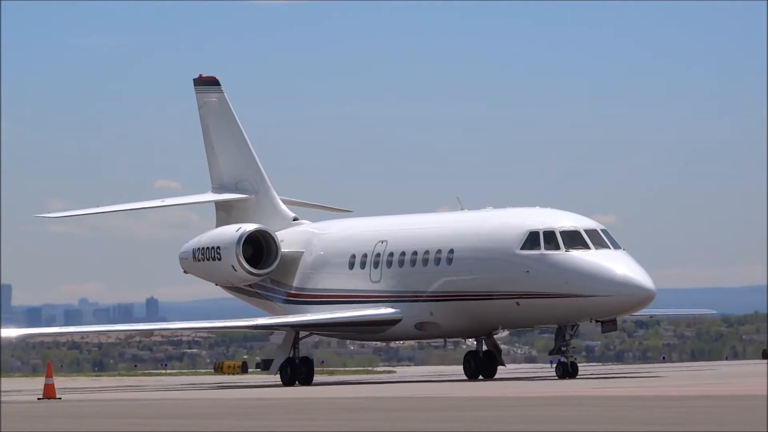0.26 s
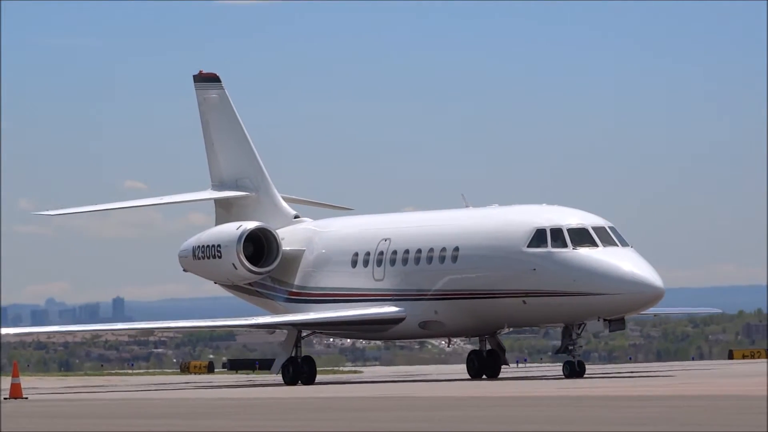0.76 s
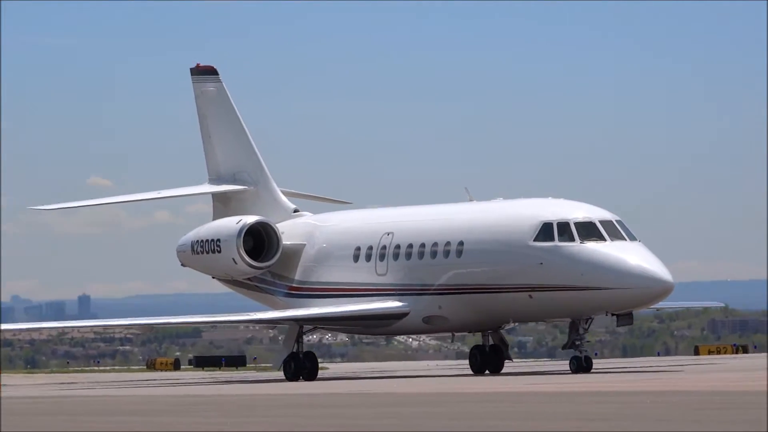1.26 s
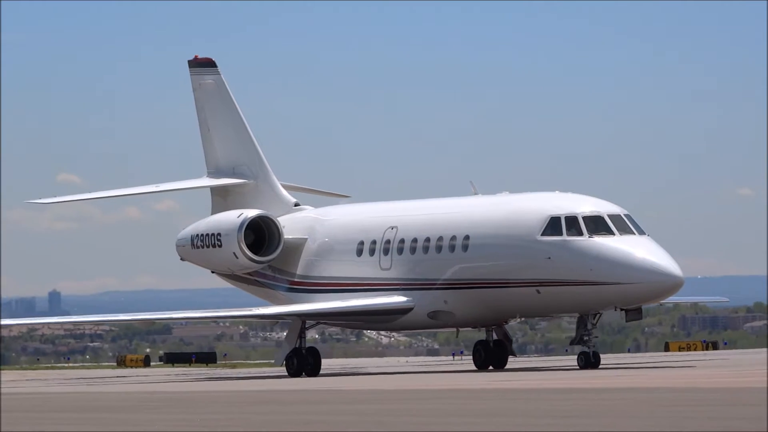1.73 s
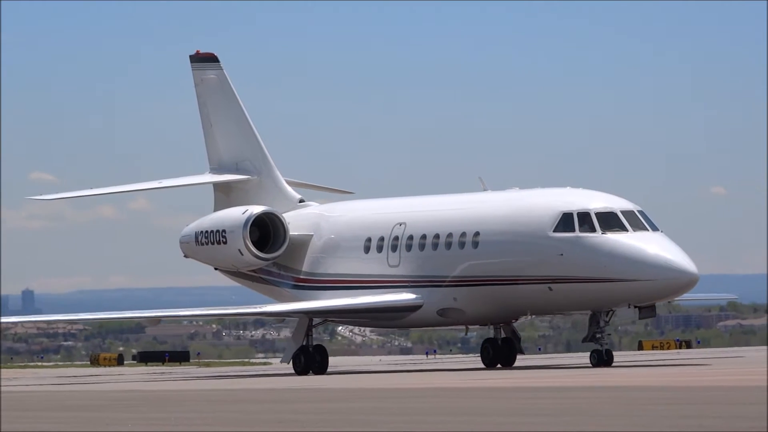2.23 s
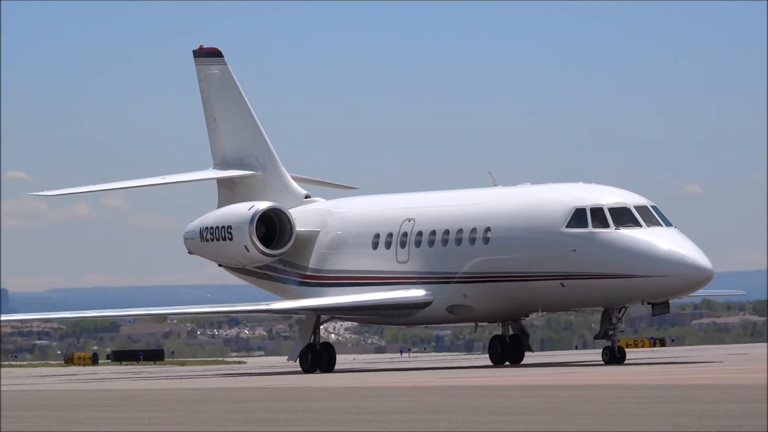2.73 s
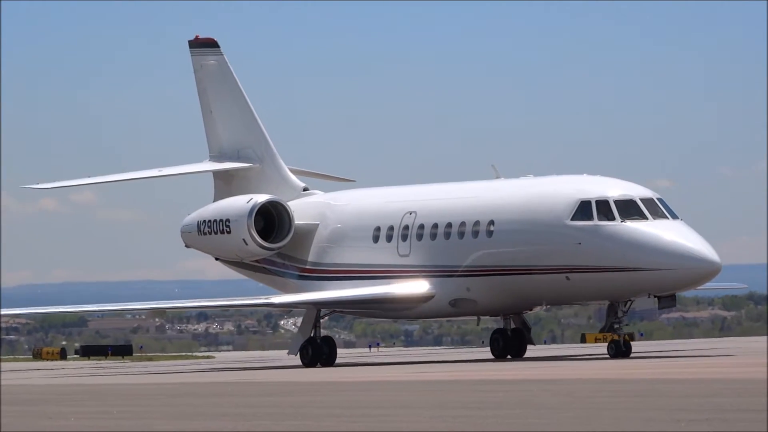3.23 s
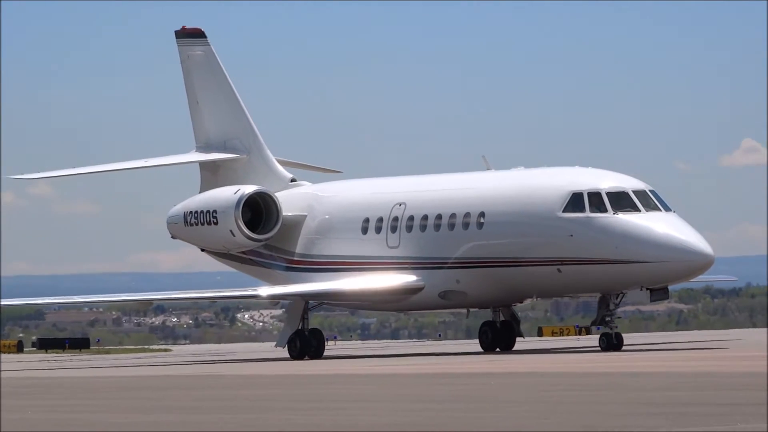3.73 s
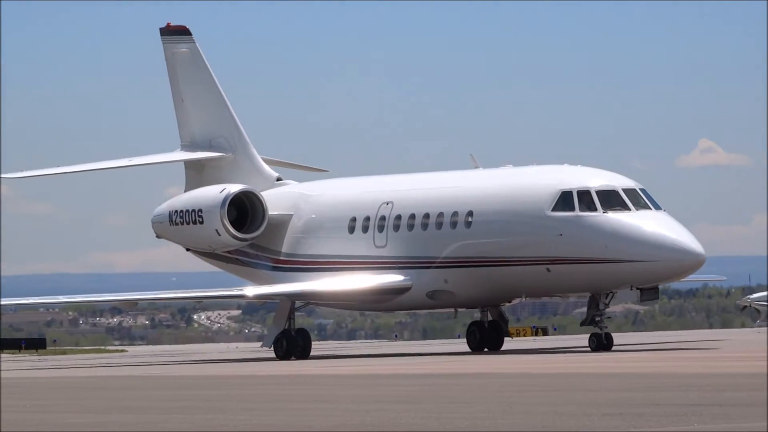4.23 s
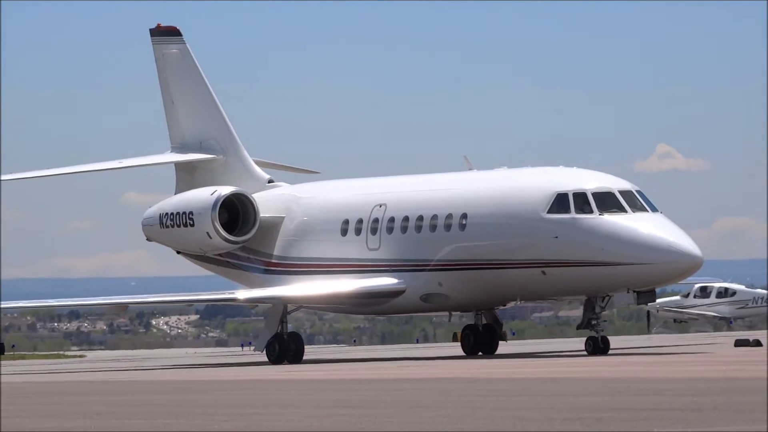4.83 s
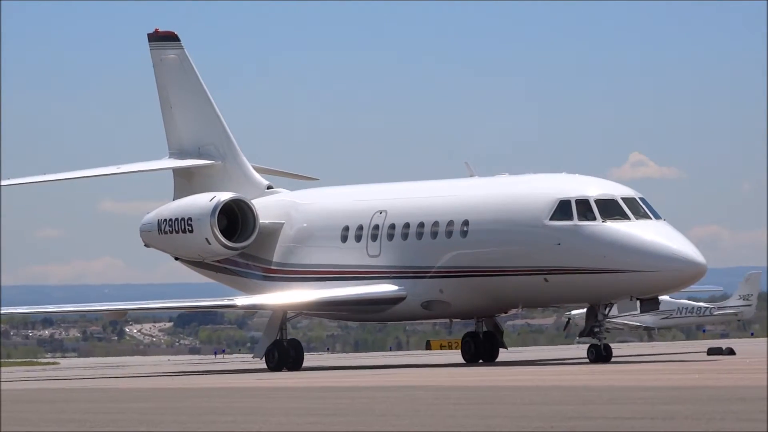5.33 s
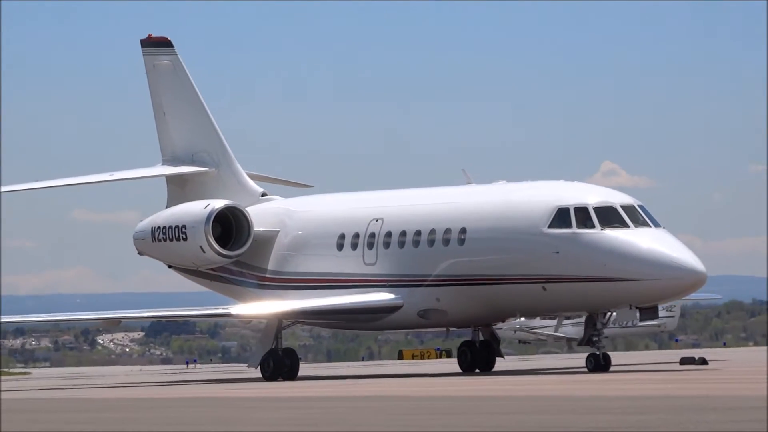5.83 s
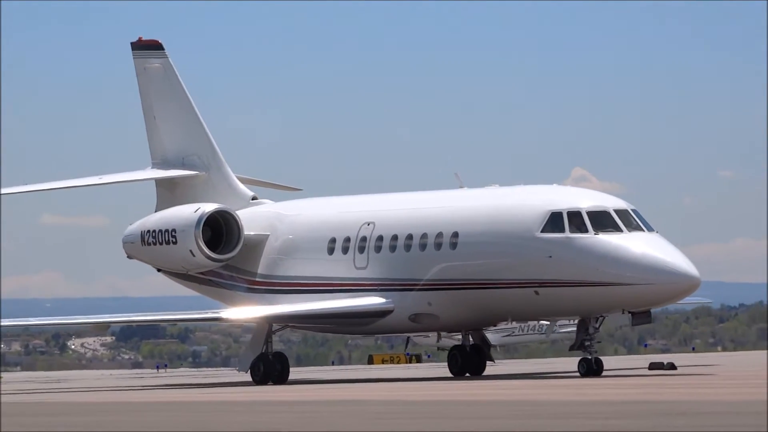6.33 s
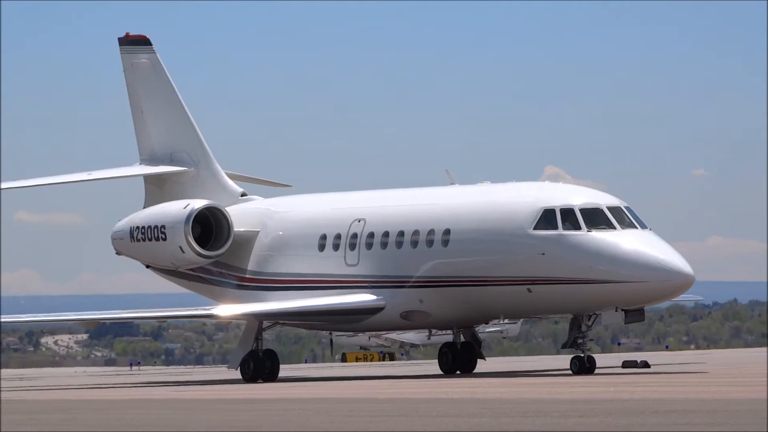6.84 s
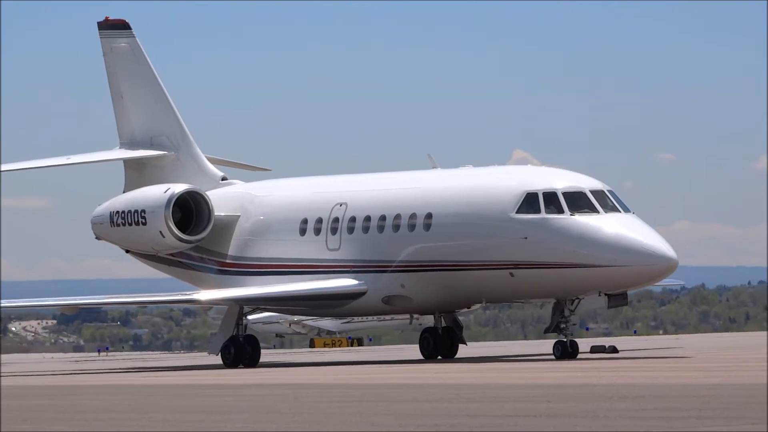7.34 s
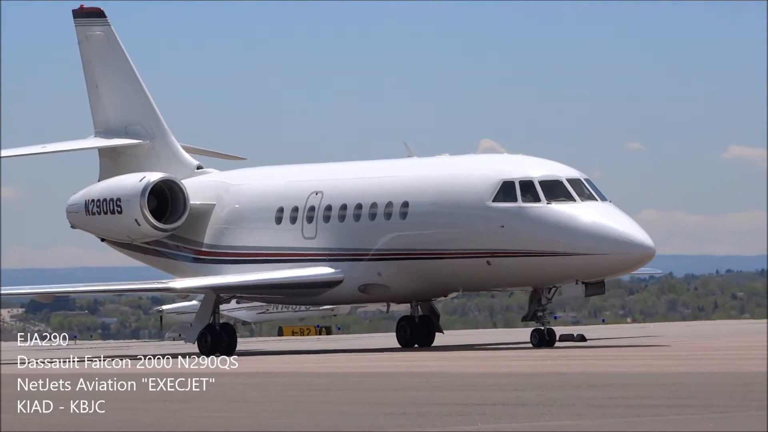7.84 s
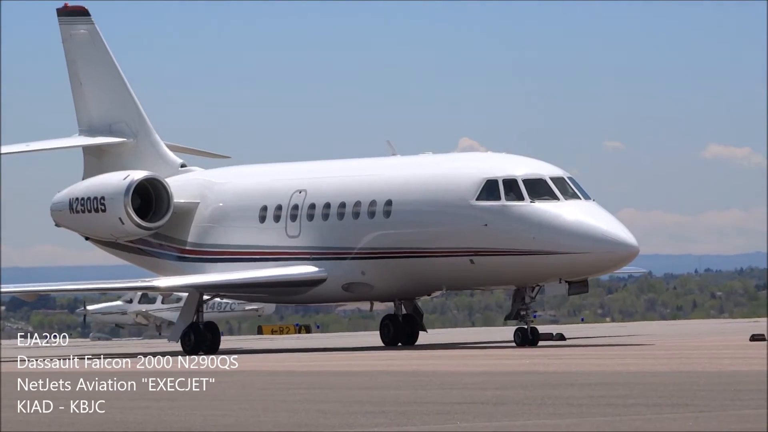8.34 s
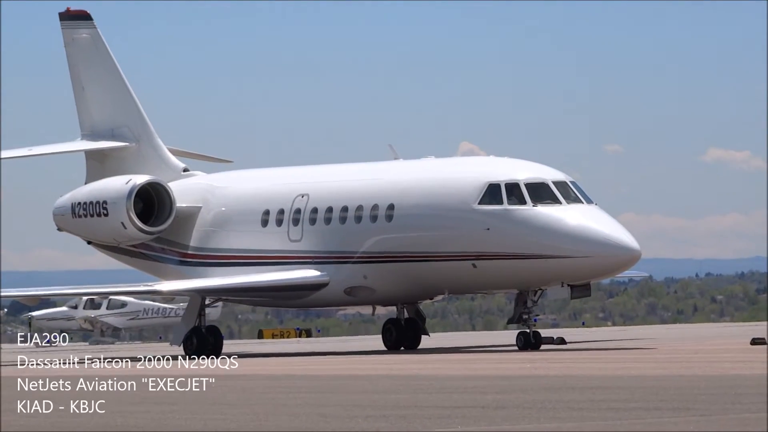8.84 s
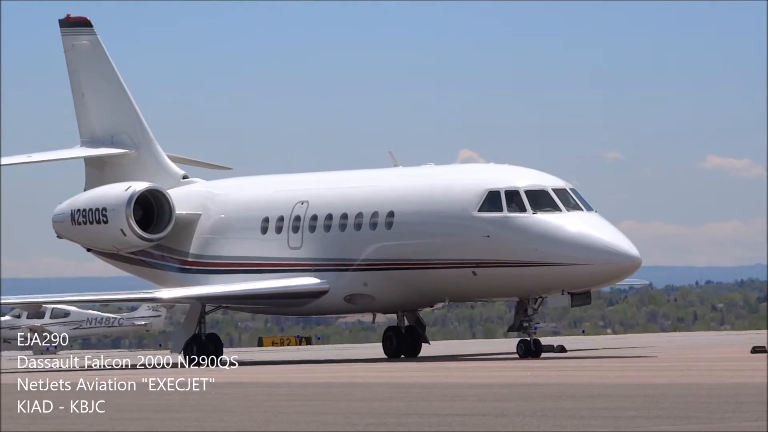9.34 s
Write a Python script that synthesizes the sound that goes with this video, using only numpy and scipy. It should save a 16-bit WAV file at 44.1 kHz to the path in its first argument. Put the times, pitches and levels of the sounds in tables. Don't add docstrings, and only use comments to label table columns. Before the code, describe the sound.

A small business jet taxis past outdoors on an airfield apron, engines at low power. A constant, bright, hissing rush fills the whole time, swelling and shimmering slightly. A thin high whine rides above it, dipping out for moments, with a lower whistle sweeping through. The camera's microphone stays some distance away, adding a slightly hollow, boxy colour.

```python
import sys
import numpy as np
from scipy import signal
from scipy.fft import rfft, irfft, next_fast_len
from scipy.io import wavfile
from scipy.ndimage import uniform_filter1d

SR = 44100
rng = np.random.default_rng(int(sys.argv[2]) if len(sys.argv) > 2 else 0)


def rack_gain(trim_db):
    fader = np.asarray(trim_db, float)
    return 10 ** (fader / 20)


def file_out(sig):
    cols = np.atleast_2d(sig).T
    lim = np.clip(cols, -1, 1)
    pcm = np.round(lim * 32767).astype(np.int16)
    wavfile.write(sys.argv[1], SR, pcm)


N = 422478

# pitch_hz, level_db (per Hz)
WASH_SPECTRUM = [(25, -32), (100, -13), (170, -12.5), (340, -7), (640, -12), (1000, -0.5), (1480, 3),
                 (2000, 2), (2700, 3), (4180, -2.5), (5000, -3), (9000, -14.5), (10400, -22), (11000, -42)]
# centre_s, half_width_s, lift_over_wash_db
GUSTS = [
    (1, .1, 3),
    (2.3, .1, 4),
    (3.15, .1, 4.5),
    (4.3, .15, 5),
    (6.55, .12, 6),
    (8, .12, 11),
    (8.55, .1, 7),
    (9.2, 0.29, 7),
]
# time_s, once_a_turn_db, twice_a_turn_db
SHAFT_HUM = [(0, -55, -36.5), (.8, -57.5, -43.5), (1.7, -52, -40), (2.2, -56, -55), (3, -51, -44),
             (3.7, -60, -54), (4.5, -48.5, -40), (5.2, -63.5, -57.5), (6, -59.5, -54.5), (7, -55.5, -52.5),
             (7.7, -59, -61), (8.3, -55, -54), (9, -43.5, -51.5), (9.58, -54, -48)]
# multiple_of_blade_pitch, level_db
WEAK_TONES = [
    (.13686, -55),
    (.20529, -50),
    (.41058, -45),
    (1.18047, -60),
    (1.8999, -65),
    (2, -70),
]
# centre_s, half_width_s, peak_db
STATOR_BEAMS = [
    (.4, .35, -33),
    (1.6, .3, -44),
    (2.9, .15, -41),
    (4.05, .1, -39),
    (4.95, .3, -42),
    (7, .3, -41),
    (7.75, .2, -42),
    (9.15, .22, -33.5),
]
# time_s, pitch_hz
WHINE_PITCH = [(0, 4912), (1.5, 4907), (3, 4902), (4.5, 4897), (5.7, 4891), (6.9, 4884), (8, 4876),
               (9.58, 4865)]
# time_s, level_db
WHINE_LEVEL = [(0.0, -31.9), (1.2, -29.6), (2.3, -30.9), (3.1, -28.0), (4.1, -31.7), (5.2, -32.8),
               (6.6, -26.5), (7.5, -25.1), (8.4, -27.2), (9.58, -37.1)]
# centre_s, half_width_s, depth_db
WHINE_FADES = [(0.426, 0.179, -13.4), (0.61, 0.254, -8.2), (1.465, 0.074, -10.0), (1.68, 0.082, -18.9),
               (1.896, 0.3, -12.1), (2.748, 0.163, -30.0), (2.984, 0.175, -11.8), (3.209, 0.107, -9.7),
               (3.432, 0.264, -30.0), (3.59, 0.038, -7.4), (3.967, 0.103, -4.7), (4.348, 0.042, -3.5),
               (5.317, 0.046, -4.1), (5.942, 0.3, -14.4), (6.157, 0.3, -23.9), (7.047, 0.203, -6.9),
               (7.773, 0.061, -3.0), (8.075, 0.239, -9.4), (8.749, 0.3, -26.8), (9.19, 0.042, -4.1),
               (9.35, 0.043, -5.0), (9.541, 0.3, -11.8)]
# pitch_hz, level_db (per Hz)
ENGINE_SPECTRUM = [(25, -42), (50, -49), (100, -15), (200, -17), (400, -9.5), (800, -0.5), (1300, -0.16),
                   (2200, -1.5), (3300, -1.8), (4600, -3.5), (5600, -12.5), (7000, -10), (9000, -18.5),
                   (11000, -30)]
HANDOVER_HZ = [450, 1150, 1850, 2400, 3200, 5400, 6250, 9000]
# time_s, air_clearness, inlet_facing_us, ground_bounce (no units)
AIR_PATH = [(0.0, -1.7, -0.1, -1), (0.73, -2.5, 1.6, 0.2), (1.07, -0.9, -0.4, -0.5),
            (1.48, -0.8, 1.2, -4.5), (2.09, 0.04, 1.4, 1.5), (2.77, 0.9, -0.55, 0), (3.07, -0.3, 0.5, 2.5),
            (3.34, 0.94, 2.4, 0.7), (4.01, 2.04, 0.55, 1.2), (4.59, -0.3, 0.8, 1.5),
            (5.39, 1.36, 1.15, -0.5), (6.0, -1, 0.1, 0), (6.56, 0.86, -0.05, 1.19), (7.07, 0.9, -1.9, -1),
            (7.32, 0.05, -1.6, -0.7), (7.89, 1.35, -1, -1), (8.56, -0.6, -1.35, 3.4),
            (9.58, 0.37, -2.5, -0.5)]
PART_ANSWERS = [
    (-0.84, -0.97, 0.09),
    (-0.87, -0.91, 0.069),
    (-1.14, 0.078, -0.69),
    (-0.33, 1.16, -0.27),
    (0.47, 1.47, -0.19),
    (1.06, 0.67, -0.4),
    (0.7, -1.7, -0.83),
    (2.5, -0.31, -0.29),
    (2, -0.49, 0.58),
]
# centre_s, half_width_s, centre_hz, change_db
RUSH_CHANGES = [(1.75, 0.13, 3000, -1.5), (6.1, 0.14, 2120, 1.5), (9.05, .15, 2100, -1.5),
                (3.7, .45, 7500, 1), (.1, 0.19, 1130, -5.5), (1.3, 0.16, 1170, 2), (1.5, .15, 3000, -3),
                (4.4, .15, 1500, 1), (6.35, .2, 2730, -0.5), (7.6, 0.13, 2150, 0), (7.9, 0.26, 1130, 2.5),
                (.58, 0.31, 3670, -6.5), (.9, 0.53, 1130, -4.5), (1.23, 0.2, 224, 10), (1.74, 0.42, 9000, 4),
                (1.79, 0.26, 3970, -5.5), (2.44, 0.74, 3280, 2.5), (3.3, 0.18, 10000, 5.5),
                (3.41, .12, 2580, -3), (3.69, 0.13, 570, -2), (4.57, 0.26, 700, 4.5), (5.18, .2, 220, -12),
                (6.4, .4, 764, 3.5), (7.08, .2, 400, 8.5), (7.4, 0.36, 8100, -2.5), (8.35, 0.24, 2100, 4),
                (9.38, 0.092, 1620, 1), (9.45, 0.4, 400, 2.5)]
# centre_hz, width_hz, change_db
HOUSING = [(162, 29, 8.2), (248, 56, 4.0), (339, 52, 7.2), (464, 36, -3.0), (544, 29, -2.1), (594, 31, 2.0),
           (702, 52, 2.4), (899, 124, -7.9), (1653, 203, 5.5), (2111, 300, 8.3), (2736, 327, 8.2),
           (3130, 123, 1.8), (3672, 184, -5.7), (3998, 264, -3.0), (4062, 91, -4.3), (4260, 229, 2.7),
           (5058, 113, 2.2), (5363, 319, -4.7), (5830, 116, -6.0), (5973, 250, 3.0), (6249, 228, -5.4),
           (6545, 554, 3.5), (7033, 117, -2.8), (7704, 178, 3.1), (8000, 289, -3.0), (8352, 328, 4.6),
           (8844, 248, 3.2), (9947, 361, 1.5), (10142, 173, -2.6), (10569, 100, -2.0)]
# pitch_hz, left_minus_right_db
PORTS = [(100, -0.5), (850, 0), (1500, 1.44), (2350, -0.1), (2650, 1.8), (3050, .5), (3600, 2),
         (4000, -1.5), (4800, 2.5), (5550, -3), (6150, -2), (6400, 0.5), (8000, -0.4), (11000, 2.5)]

ENGINE_DB, WASH_DB = -21.5, -41.5
GUST_TOP_HZ = 450
SHAFT_SHARE = .034215
STATOR_HZ, STATOR_SINK_HZ_PER_S, STATOR_FLOOR_DB = 2516, 1.2, -49
FAR_ENGINE_FROM_S, FAR_ENGINE_LOWER_HZ = 6, 17
SWELL_DEPTH = 1.07
CHANGE_OCTAVES = 0.34


def along(table, x):
    first, *columns = np.transpose(table)
    return [np.interp(x, first, column) for column in columns]


def colour(table, hz):
    table = np.array(table, float)
    return np.interp(np.log(hz + 1), np.log(table[:, 0]), table[:, 1])


def level(x, db):
    return x * rack_gain(db) / np.sqrt(np.mean(x ** 2))


def bell(s, centre_s, half_width_s):
    return np.exp(-((s - centre_s) / half_width_s) ** 2)


def patches(shape, bins, frames):
    field = rng.standard_normal(shape)
    for _ in range(2):
        field = uniform_filter1d(field, max(int(bins), 1), axis=0)
        field = uniform_filter1d(field, max(int(frames), 1), axis=1)
    return field / field.std()


def drift(rate):
    coarse = patches((1, N // 100 + 2), 1, SR / 100 / rate)[0]
    return np.interp(np.arange(N) / 100, np.arange(len(coarse)), coarse)


def shaped_noise(db_of):
    hz, s, spectrum = signal.stft(rng.standard_normal(N), SR, nperseg=1024)
    shaped = spectrum * rack_gain(db_of(hz[:, None], s))
    return signal.istft(shaped, SR, nperseg=1024)[1][:N]


def causal(x, db):
    cepstrum = irfft(db * np.log(10) / 20)
    half = len(cepstrum) // 2
    cepstrum[1:half] *= 2
    cepstrum[half + 1:] = 0
    response = irfft(np.exp(rfft(cepstrum)))
    return signal.fftconvolve(x, response)[:N]


def tone(hz, db, waver_hz):
    cycles = np.cumsum(hz + waver_hz * drift(17.6)) / SR
    return np.sqrt(2) * rack_gain(db) * np.sin(2 * np.pi * (cycles + rng.random()))


def wash():
    def db_of(hz, s):
        gust_db = sum(db * bell(s, at_s, half_s) for at_s, half_s, db in GUSTS)
        bass_lift_db = gust_db / (1 + (hz / GUST_TOP_HZ) ** 4)
        patch_db = 2.8 * patches((len(hz), len(s)), 3, 3)
        return colour(WASH_SPECTRUM, hz) + patch_db + bass_lift_db
    return level(shaped_noise(db_of), WASH_DB)


def shaft_hum(blade_hz, s):
    out = np.zeros(N)
    for turns, db in enumerate(along(SHAFT_HUM, s), 1):
        unsteady_db = db - 4 + 6 * np.tanh(drift(40))
        out += tone(turns * SHAFT_SHARE * blade_hz, unsteady_db, 4)
    return out


def weak_tones(blade_hz):
    out = np.zeros(N)
    for multiple, db in WEAK_TONES:
        out += tone(multiple * blade_hz, db + 3 * drift(2.4), 1.0 * multiple)
    return out


def stator_tone(s):
    hz = STATOR_HZ - STATOR_SINK_HZ_PER_S * s
    hz = hz - FAR_ENGINE_LOWER_HZ * (s > FAR_ENGINE_FROM_S)
    swells = sum(rack_gain(db) * bell(s, at_s, half_s) for at_s, half_s, db in STATOR_BEAMS)
    beam_db = 20 * np.log10(rack_gain(STATOR_FLOOR_DB) + swells)
    return tone(hz, beam_db + 1.9 * drift(18), 2.43)


def blade_whine(blade_hz, s):
    db, = along(WHINE_LEVEL, s)
    for at_s, half_s, depth_db in WHINE_FADES:
        off = ((s - at_s) / half_s) ** 2
        db = db + 10 * np.log10((off + rack_gain(depth_db) ** 2) / (off + 1))
    return tone(blade_hz, db + 1.1 * drift(50) + .8 * drift(28), 1.0)


def tones():
    s = np.arange(N) / SR
    blade_hz, = along(WHINE_PITCH, s)
    return shaft_hum(blade_hz, s) + weak_tones(blade_hz) + stator_tone(s) + blade_whine(blade_hz, s)


def rush_changes(hz, s):
    at_s, half_s, centre_hz, db = np.transpose(RUSH_CHANGES)
    in_pitch = np.exp(-(np.log2((hz + 1) / centre_hz) / CHANGE_OCTAVES) ** 2)
    return db * in_pitch @ bell(s, at_s[:, None], half_s[:, None])


def rush():
    def db_of(hz, s):
        above = [1 / (1 + (edge_hz / (hz + 1)) ** 24) for edge_hz in HANDOVER_HZ]
        shares = -np.diff([1 + 0 * hz, *above, 0 * hz], axis=0)
        parts_db = SWELL_DEPTH * np.array(PART_ANSWERS) @ along(AIR_PATH, s)
        swell_db = sum(share * db for share, db in zip(shares, parts_db))
        slow_db = 1.43 * patches(swell_db.shape, 3, 25)
        treble = np.clip(hz / 8000, 0, 1) ** 0.5
        flutter_db = 0.88 * treble * patches(swell_db.shape, 84, 4)
        return colour(ENGINE_SPECTRUM, hz) + swell_db + rush_changes(hz, s) + slow_db + flutter_db
    return shaped_noise(db_of)


def housing_gain(hz):
    return sum(db / (1 + abs(2 * (hz - centre_hz) / width_hz) ** 2.5) for centre_hz, width_hz, db in HOUSING)


def scene():
    hz = np.arange(4097) * SR / 8192
    jet = level(causal(rush(), housing_gain(hz)), ENGINE_DB) + tones()
    lean_db, = along(PORTS, hz)
    wide = wash()
    left = causal(jet, lean_db / 2) + wide
    right = causal(jet, -lean_db / 2) - wide
    return np.array([left, right])


def low_pass(x):
    return signal.sosfilt(signal.butter(12, 11110, fs=SR, output="sos"), x)


def record(dry):
    power = uniform_filter1d(uniform_filter1d(np.mean(dry ** 2, axis=0), 120), 120)
    held = dry * (power / power.mean()) ** -.08
    rounded = np.tanh(2.196 * held) / 2.11
    size = next_fast_len(N)
    hz = np.arange(size // 2 + 1) * SR / size
    bass_cut = hz ** 2 / (hz ** 2 + 28 ** 2)
    top_cut = hz < 11015
    mix = irfft(rfft(rounded, size) * bass_cut * top_cut, size)[:, :N]
    return low_pass(mix)


dry = scene()
out = record(dry)
file_out(out)
```